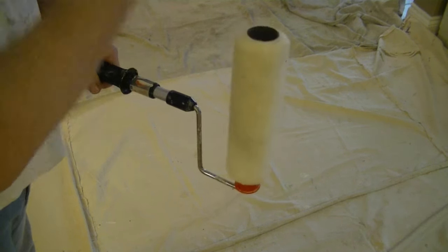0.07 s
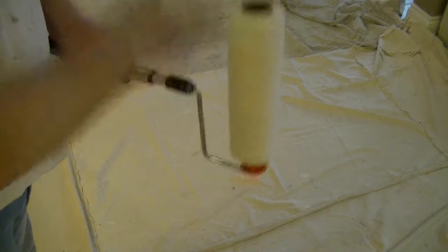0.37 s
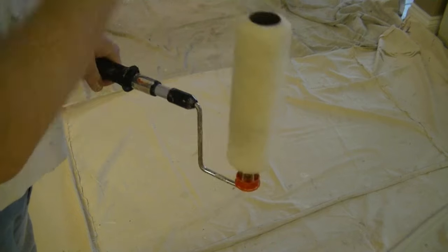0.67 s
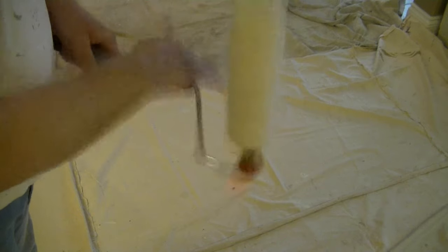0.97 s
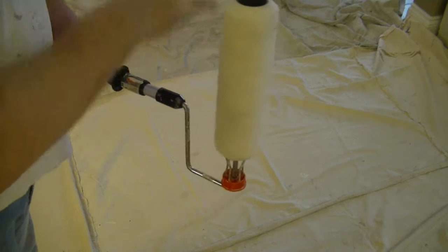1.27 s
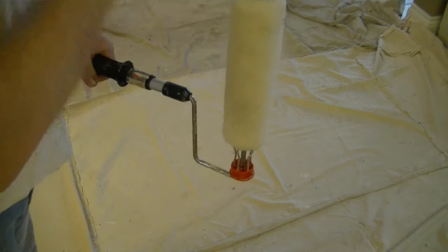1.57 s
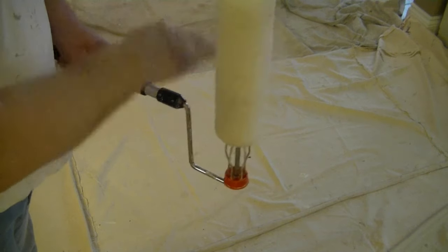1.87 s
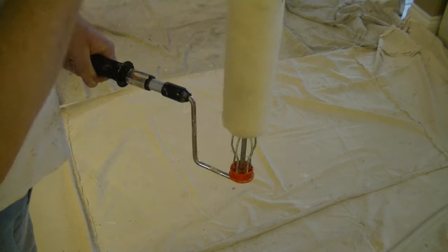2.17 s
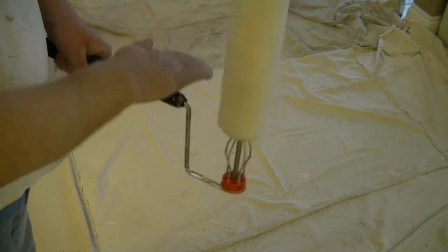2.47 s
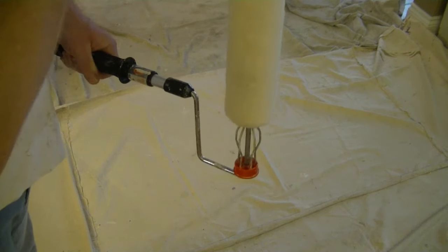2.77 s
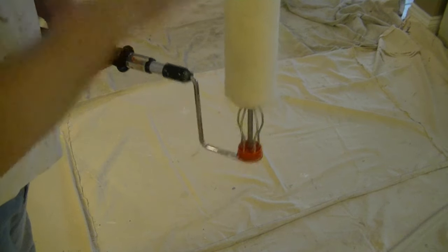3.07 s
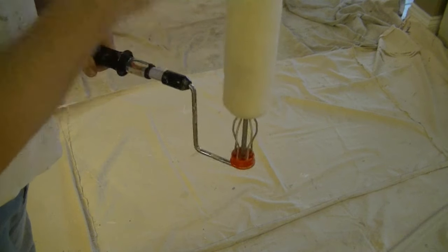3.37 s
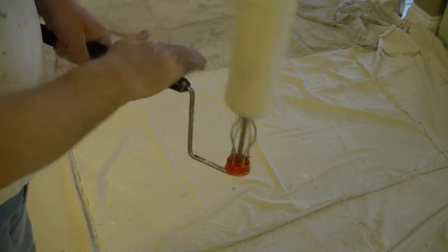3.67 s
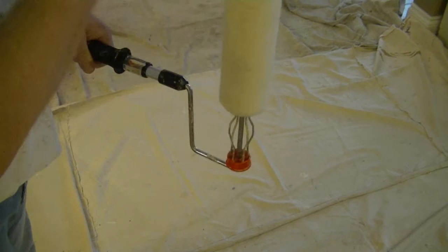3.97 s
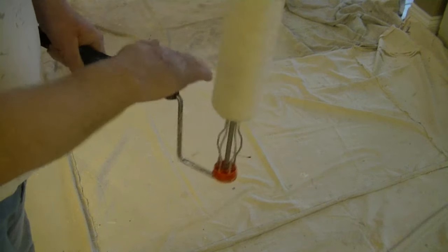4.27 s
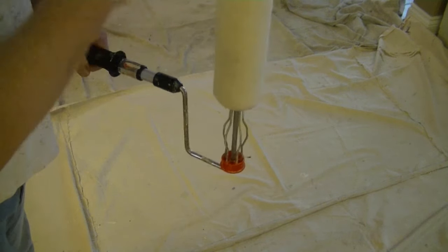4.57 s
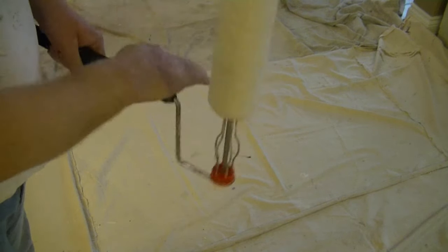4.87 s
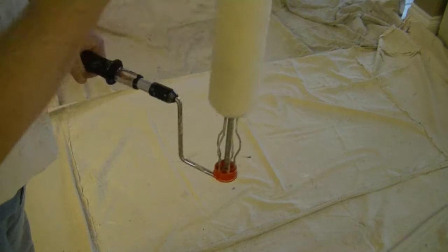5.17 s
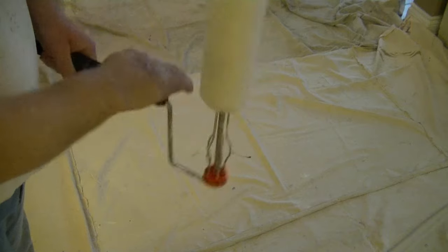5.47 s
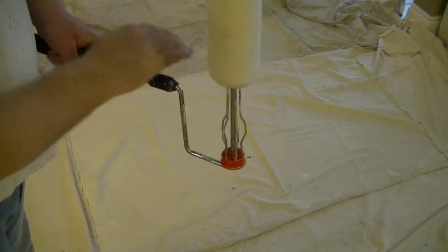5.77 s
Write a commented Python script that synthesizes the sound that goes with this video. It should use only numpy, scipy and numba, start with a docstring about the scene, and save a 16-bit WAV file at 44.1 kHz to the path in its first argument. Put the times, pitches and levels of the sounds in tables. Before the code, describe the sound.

A hand strikes a paint roller sleeve nine times at a steady pace, a little over half a second apart. Each blow is a sharp, gritty crack with a hollow note and a short ring from the steel frame. As the sleeve slides off, the bared wire cage rings more clearly. Faint pole knocks, wire ticks, tiny squeaks and shirt rustle fill the gaps. The sound is close, in a bare, slightly echoing room.

```python
"""Knocking a paint roller sleeve off its cage

In a bare room, a hand gives the sleeve a sharp tap about every 0.6 s. Each blow skids it along
the wires and rings its hollow core and the steel frame; once bared, the wire cage rings out too.
Between blows the pole knocks, the wires tick and squeak, and a shirt swishes softly.
A limiter turns the sound down on every tap, then lets the room's ring swell back up."""
import sys
import numpy as np
from scipy import signal
from scipy.fft import rfft, irfft
from scipy.io import wavfile
from numba import njit

SR = 44100
rng = np.random.default_rng(int(sys.argv[2]) if len(sys.argv) > 2 else 0)


def file_out(sig):
    """Save sig as 16-bit WAV at sys.argv[1]."""
    # one column per channel
    cols = np.atleast_2d(sig).T
    # limit, then scale
    lim = np.clip(cols, -1, 1)
    pcm = np.round(lim * 32767).astype(np.int16)
    wavfile.write(sys.argv[1], SR, pcm)


N = 266099

# Levels are relative. A "t60" is the time a sound takes to fade by 60 dB.
# The room's steady hush. Each row: frequency in Hz, level in dB.
HUSH_COLOUR = [(25, -18), (120, 4.5), (360, -24.5), (550, -28), (950, 7), (1730, -2), (3100, -6),
               (6000, -8.5), (10500, -9.5), (13000, -29)]
# How long the room rings. Each row: frequency in Hz, t60 in seconds.
ROOM_FADE_TIMES = [(100, 0.83), (400, 0.76), (1000, 0.64), (2200, 0.62), (4500, 0.47), (8000, 0.28),
                   (13000, 0.26)]
# The tone of that ring. Each row: frequency in Hz, level in dB.
ROOM_TAIL_COLOUR = [(50, -36.5), (130, -3), (300, -3.5), (1000, 2.5), (3000, -3), (6000, -0.5), (13000, 6)]
# The shirt's swish. Each row: frequency in Hz, level in dB.
SHIRT_COLOUR = [(60, -48), (180, -7), (350, -15), (550, -1), (900, -14.5), (2000, -15.5), (5000, -26.5),
                (10500, -29.5), (13500, -39.5)]
# Handling grows as the roller gets top-heavy, then settles. Each row: time in seconds, level in dB.
GRIP_EFFORT = [(0, -13.5), (2.7, 0.5), (3.05, -6.5), (4.2, -1), (6.03, -3.5)]
# The loose pole and handle knock. Each row: start in seconds, level in dB.
POLE_KNOCKS = [(.449, -28.5), (1.5285, -30), (2.856, -28), (3.096, -39), (3.1932, -27), (4.1241, -27.5),
               (4.623, -26.5), (4.7976, -29), (5.9624, -29.5)]
# The dull tone of a knock. Each row: frequency in Hz, level in dB.
POLE_COLOUR = [(60, -26), (200, -9), (380, 0), (900, -3), (1800, -10), (4000, -24), (10000, -40),
               (14000, -60)]
# Wires snap against the sleeve. Each row: start in seconds, level in dB.
WIRE_TICKS = [(.1192, -20), (.7593, -19), (2.378, -42), (3.298, -16)]
# The bright tone of a tick. Each row: frequency in Hz, level in dB.
WIRE_TICK_COLOUR = [(1000, -2), (4000, -6), (6000, -16.5), (8000, -3), (11000, -6.5), (14500, -13.5)]
# Wires squeak inside the sleeve. Each row: start in seconds, length in seconds, level in dB.
WIRE_SQUEAKS = [(3.854, 0.1, -44), (4.347, 0.048, -34.5), (4.692, 0.018, -53), (4.92, 0.063, -33)]
# The tones in a squeak. Each row: pitch in Hz, level in dB.
SQUEAK_TONES = [(6925, -4), (9490, -15)]
# The steel frame's ringing tones. Each row: pitch in Hz, level in dB, t60 in seconds.
FRAME_TONES = [(2510, 1, 0.042), (3570, -2, 0.07), (4100, 5, 0.03), (4190, -4.5, 0.19), (5000, -19, 0.3),
               (6960, -13, 0.25)]
# The hand lands, the sleeve skids, then catches. Each row: delay in seconds, level in dB, t60 in seconds.
SKID_CONTACTS = [(0, -3, 0.045), (.0022, -6.5, 0.018), (.0037, 0.5, 0.017)]
# The crack of hand and sleeve. Each row: frequency in Hz, level in dB.
CRACK_COLOUR = [(40, -11.5), (120, -17.5), (250, -5.5), (420, 0.5), (750, -2), (1150, -0.5), (1480, -4),
                (1800, -1.5), (2500, -5), (3800, -11.5), (4800, -17.5), (9000, -18), (12000, -26),
                (14000, -51)]
# The taps. Pitches shift as the sleeve creeps up; a square blow jolts the frame more than a glancing one. #
# Each row: start in seconds, level in dB, frame jolt in dB, pitch of the air in the sleeve in Hz, # level of
# that air in dB, core pitch in Hz, cage pitch in Hz (before the wires are bared, another tone of the sleeve).
HAND_TAPS = [(-.1, 0, -21, 475, -8.5, 1200, 930), (0.5118, 2, -18, 483.5, -10.5, 2020, 1187),
             (1.0955, 3, -18, 533, -9, 1985, 1730), (1.773, 2.5, -18.5, 589, -12.5, 1224, 903),
             (2.4366, -3, -14, 646, -11, 2360, 898), (3.2418, -3, -26.5, 606, -17, 2466, 898),
             (3.7166, -0.5, -21, 666, -10, 2260, 869.6), (4.2410, -1.5, -18.5, 731, -13.5, 3650, 842),
             (4.8410, -0.5, -19, 640, -15, 2356, 888), (5.4168, -0.5, -12.5, 596, -7, 1594, 897)]
# The left microphone's tone against the right. Each row: frequency in Hz, level in dB.
LEFT_MIC_COLOUR = [(60, -4.5), (200, -4.5), (600, -3.5), (1500, -1.5), (7000, -1), (13000, -1.5)]


def gain(db):
    """Turn decibels into a number to multiply by."""
    return 10 ** (np.asarray(db) / 20)


def clock(seconds):
    """The time of each sample in a stretch of sound."""
    return np.arange(int(seconds * SR)) / SR


def unit(x):
    """Scale a sound so its energy is 1."""
    return x / np.sqrt(np.sum(x ** 2, axis=-1, keepdims=True))


def lookup(points, hz):
    """Read between the rows of a frequency table, with octaves evenly spaced."""
    row_hz, value = np.transpose(points)
    return np.interp(np.log(np.maximum(hz, 1)), np.log(row_hz), value)


def colour(x, points, tilt_db=0, size=2048):
    """Filter a sound to a table's tone, adding tilt_db for each octave up."""
    hz = np.maximum(np.fft.rfftfreq(size, 1 / SR), 20)
    curve_db = lookup(points, hz) + tilt_db * np.log2(hz / np.mean(hz))
    cepstrum = irfft(np.log(gain(curve_db)))
    # fold it so the filter never rings before the sound arrives
    cepstrum[1:size // 2] *= 2
    cepstrum[size // 2 + 1:] = 0
    response = irfft(np.exp(rfft(cepstrum)))
    return signal.fftconvolve(np.atleast_2d(x), response[None], axes=-1)[:, :x.shape[-1]]


def add(track, start_s, sound):
    """Mix a sound into a track, as far as it fits."""
    start = int(round(start_s * SR))
    a, b = max(start, 0), min(start + sound.shape[-1], track.shape[-1])
    if b > a:
        track[..., a:b] += sound[..., a - start:b - start]


def noise(count, shared):
    """Left and right noise; shared runs from 0 (unrelated) to 1 (the same)."""
    white = rng.standard_normal((3, count))
    return np.sqrt(shared) * white[0] + np.sqrt(1 - shared) * white[1:]


def fade(t, t60):
    """Die away by 60 dB in t60 seconds."""
    return np.exp(-np.log(1000) * t / t60)


def ping(t, hz, t60, rise_s=0.0018):
    """One fading tone of a struck object."""
    return unit(np.sin(2 * np.pi * hz * t) * fade(t, t60) * (1 - np.exp(-t / rise_s)))


def hush(level_db=-60):
    """The room's faint, steady noise."""
    return gain(level_db) * np.sqrt(N) * unit(colour(noise(N, 0.067), HUSH_COLOUR))


def room(tail_db, early_db, early_t60=0.1, shared=0.17, build_s=0.0081):
    """Bare walls give quick, dense echoes, then a tail whose treble dies first."""
    t = clock(1)
    hz = np.fft.rfftfreq(len(t), 1 / SR)
    spectrum = rfft(noise(len(t), shared))
    band_hz, band_t60 = np.transpose(ROOM_FADE_TIMES)
    tail = 0
    for share, t60 in zip(np.eye(len(band_hz)), band_t60):
        band = lookup(np.column_stack([band_hz, share]), hz)
        tail = tail + irfft(spectrum * band, len(t)) * fade(t, t60)
    onset = 1 - np.exp(-t / build_s)
    early = unit(noise(len(t), shared) * fade(t, early_t60) * onset)
    return gain(tail_db) * colour(unit(tail * onset), ROOM_TAIL_COLOUR) + gain(early_db) * early


def in_room(sound, echo):
    """A sound followed by the room's ring."""
    heard = signal.fftconvolve(sound * np.ones((2, 1)), echo, axes=-1)
    add(heard, 0, sound)
    return heard


def grip_db(time_s):
    """How hard the grip works at a given time."""
    return np.interp(time_s, *np.transpose(GRIP_EFFORT))


def shirt_rustle(level_db=-53, lag_s=0.19, width_s=0.39, flutter_db=2.5, flutters=130):
    """The shirt swishes unevenly as the arm swings back after each tap."""
    t = np.arange(N) / SR
    swings = sum(np.exp(-.5 * ((t - start - lag_s) / width_s) ** 2) for start, *_ in HAND_TAPS)
    flutter = np.interp(t, np.linspace(0, t[-1], flutters), rng.standard_normal(flutters))
    cloth = np.sqrt(N) * unit(colour(noise(N, 0.33), SHIRT_COLOUR))
    return cloth * swings * gain(level_db + grip_db(t) + flutter_db * flutter)


def grip_bumps(echo, per_second=16, hz=373, level_db=-16.5, spread_db=4, detune=0.207):
    """The handle shifts in the grip: soft, dull bumps at uneven times."""
    out, t = np.zeros(N), clock(.12)
    for k, (late, size, pitch) in enumerate(rng.standard_normal((160, 3))):
        start = (k + late / 2) / per_second
        bump = ping(t, hz * np.exp(detune * pitch), t60=0.067)
        add(out, start, gain(level_db + grip_db(start) + spread_db * size) * bump)
    return in_room(out, echo)[:, :N]


def clicks(events, tone, echo, t60, boost_db, tilt_db=0):
    """Parts knock or tick together: short bursts of noise in the tone of what is hit."""
    out, t = np.zeros((2, N)), clock(0.11)
    for start, db in events:
        burst = unit(colour(noise(len(t), 0.31) * fade(t, t60), tone, tilt_db))
        add(out, start, gain(boost_db + db) * in_room(burst, echo))
    return out


def wire_squeaks(echo, waver_hz=35):
    """Wires rub and sing thinly as the sleeve settles."""
    out = np.zeros((2, N))
    for start, length, db in WIRE_SQUEAKS:
        t = clock(length)
        drift_hz = waver_hz * np.interp(t, np.linspace(0, length, 20), rng.standard_normal(20))
        waver = np.cumsum(drift_hz) / SR
        tone = sum(gain(part_db) * np.sin(2 * np.pi * (hz * t + waver)) for hz, part_db in SQUEAK_TONES)
        add(out, start, gain(db) * in_room(tone * np.sin(np.pi * t / length), echo))
    return out


def cage_ring(t, tap_s, hz, bare_s=2.27, bare_db=3, muted_db=-11.5, loss_db_per_s=3.5, detune_hz=15):
    """The cage's curved wires differ a little in pitch, so their ring wobbles."""
    # the sleeve mutes them until it slips past the curve; then the ring weakens tap by tap
    db = bare_db - loss_db_per_s * (tap_s - bare_s) if tap_s > bare_s else muted_db
    return gain(db) * unit(ping(t, hz - detune_hz, t60=0.12) + ping(t, hz + detune_hz, t60=0.042))


def rebounds(t, ringing, rattle_s=.034, swing_back_s=.11, level_db=-17, loss_db_per_s=48.5):
    """The sleeve rattles, then the roller swings back on its axle; both scuff and ring it again."""
    out = np.zeros(len(t))
    for lag in np.array([rattle_s, swing_back_s]) * np.exp(.1 * rng.standard_normal(2)):
        scuff = unit(colour(rng.standard_normal(len(t)) * fade(t, t60=0.14), CRACK_COLOUR))[0]
        add(out, lag, gain(level_db - loss_db_per_s * lag) * (gain(-3) * scuff + ringing))
    return out


def sleeve_skid(t, chatter_db=-18, chatter_t60=0.13):
    """The sleeve skids in a few quick, gritty jerks, then the wires chatter."""
    grit = gain(chatter_db) * unit(noise(len(t), 0.99) * fade(t, chatter_t60))
    for lag, db, t60 in SKID_CONTACTS:
        add(grit, lag, gain(db) * unit(noise(len(t), 0.32) * fade(t, t60)))
    return unit(grit)


def hand_taps(force_db=27, catch_s=.0028, palm_hz=100, core_db=-9, crack_tilt_db=0.98):
    """Each blow thumps and cracks; as the sleeve catches, its air, core, cage and frame ring."""
    out, t = np.zeros((2, N)), clock(0.37)
    frame = sum(gain(db) * ping(t, hz, t60) for hz, db, t60 in FRAME_TONES)
    # the walls hear the crack from every side, so its grit evens out to one clean snap
    snap = unit(colour(signal.unit_impulse(len(t)), CRACK_COLOUR, crack_tilt_db))
    for start, db, jolt_db, air_hz, air_db, core_hz, cage_hz in HAND_TAPS:
        air = gain(air_db) * ping(t, air_hz, t60=0.086)
        core = gain(core_db) * ping(t, core_hz, t60=.011)
        ringing = air + core + cage_ring(t, start, cage_hz) + gain(jolt_db) * frame
        thump = gain(1.5 + 2 * jolt_db) * ping(t, palm_hz, t60=0.059)  # grows faster than the jolt
        body = thump + rebounds(t, ringing)
        add(body, catch_s, ringing)
        crack = unit(colour(sleeve_skid(t), CRACK_COLOUR, crack_tilt_db))
        # roller and arm move between blows, so each blow gets its own echoes
        heard = signal.fftconvolve(body + snap, room(tail_db=-7, early_db=-15), axes=-1)
        add(heard, 0, body + crack)
        add(out, start, gain(force_db + db) * heard)
    return out


def scene():
    """Taps and small handling sounds over the room's hush."""
    echo = room(tail_db=-1.5, early_db=-32)
    taps = hand_taps()
    ticks = clicks(WIRE_TICKS, WIRE_TICK_COLOUR, gain(-5) * echo, t60=0.013, boost_db=18.5)
    knocks = clicks(POLE_KNOCKS, POLE_COLOUR, echo, t60=0.03, boost_db=16, tilt_db=-1.5)
    return taps + ticks + knocks + grip_bumps(echo) + wire_squeaks(echo) + shirt_rustle() + hush()


@njit
def follow_peaks(sizes, attack, release):
    """Track the level: jump up with each peak, then sink slowly."""
    out, level = np.empty(len(sizes)), 1e-9
    for i, size in enumerate(sizes):
        level = level + (size - level) * attack if size > level else level * release
        out[i] = level
    return out


def record(dry, ceiling=0.9, attack_s=0.000083, release_db_per_s=85, low_cut_hz=95, top_hz=14600):
    """The left microphone is weaker; a limiter ducks both sides; deep bass and top treble are cut."""
    mics = np.vstack([gain(-1.2) * colour(dry[0], LEFT_MIC_COLOUR), dry[1:]])
    ahead = int(.004 * SR)  # the limiter listens ahead, so a blow keeps its shape
    sizes = np.pad(np.abs(mics).max(axis=0)[ahead:], (0, ahead))
    peak = follow_peaks(sizes, 1 - np.exp(-1 / (attack_s * SR)), float(gain(-release_db_per_s / SR)))
    ducked = mics * np.minimum(1, ceiling / peak)
    rounded = 1.05 * np.tanh(ducked / 1.05)  # soften the peaks
    thinned = signal.sosfilt(signal.butter(2, low_cut_hz, "highpass", fs=SR, output="sos"), rounded)
    return signal.sosfilt(signal.ellip(8, .2, 80, top_hz, fs=SR, output="sos"), thinned)


dry = scene()
out = record(dry)
file_out(out)
```